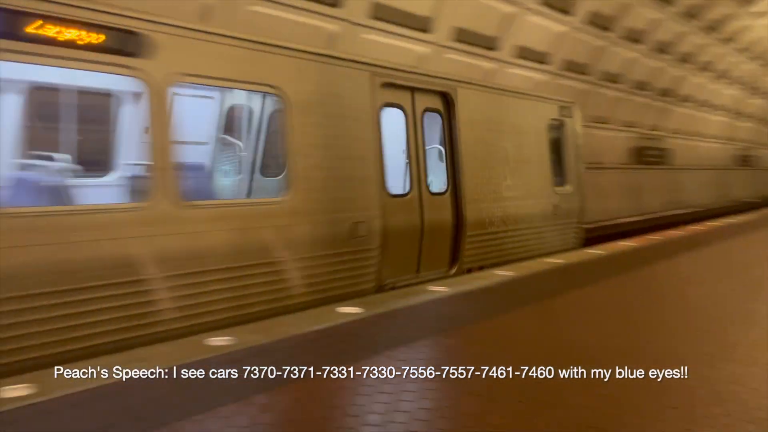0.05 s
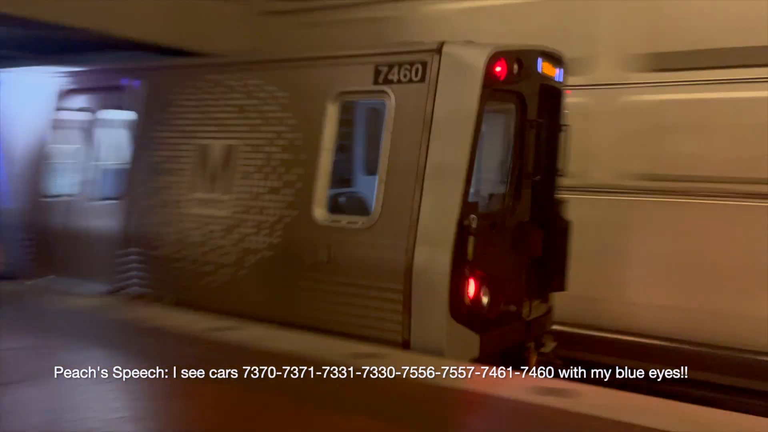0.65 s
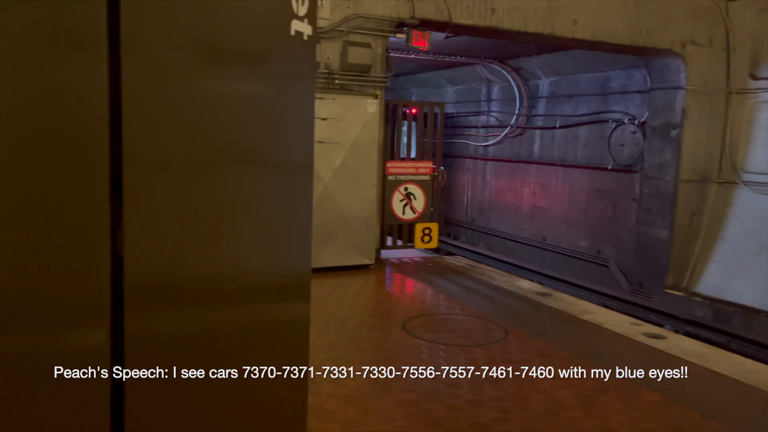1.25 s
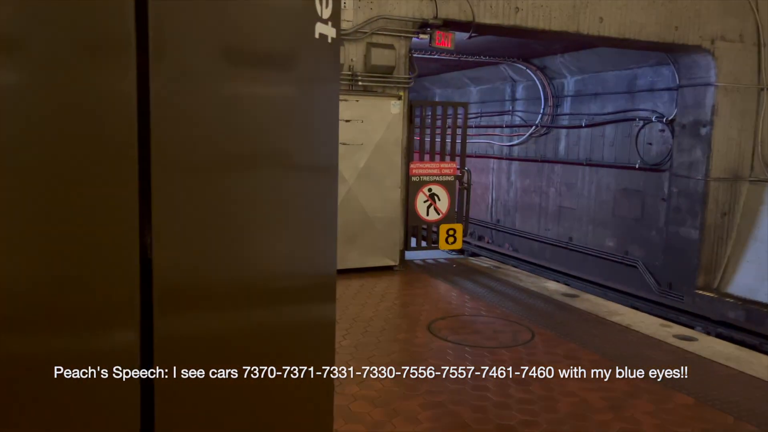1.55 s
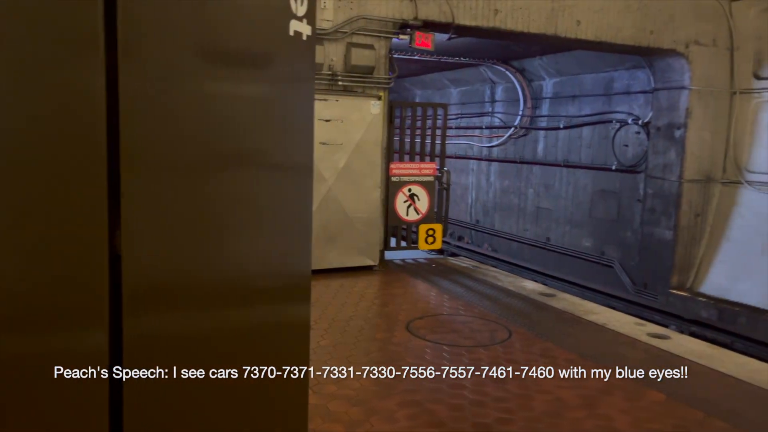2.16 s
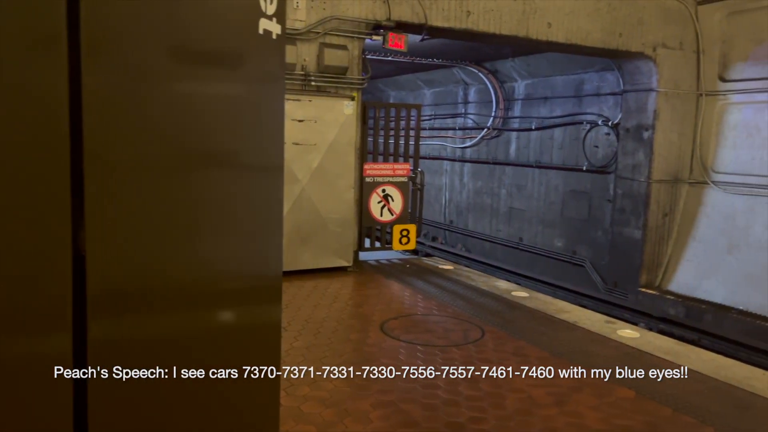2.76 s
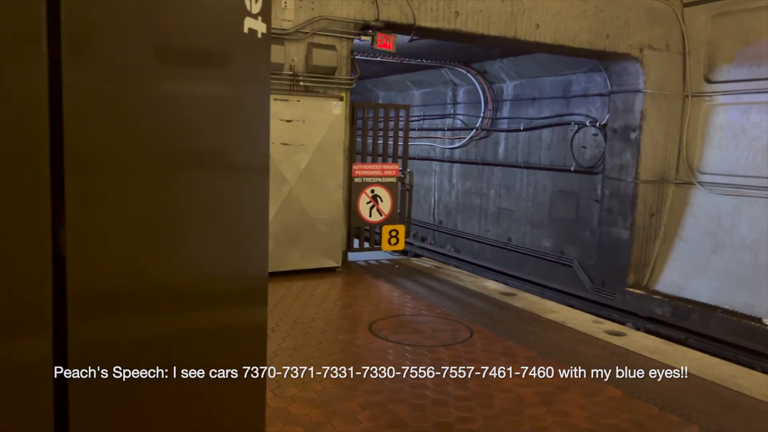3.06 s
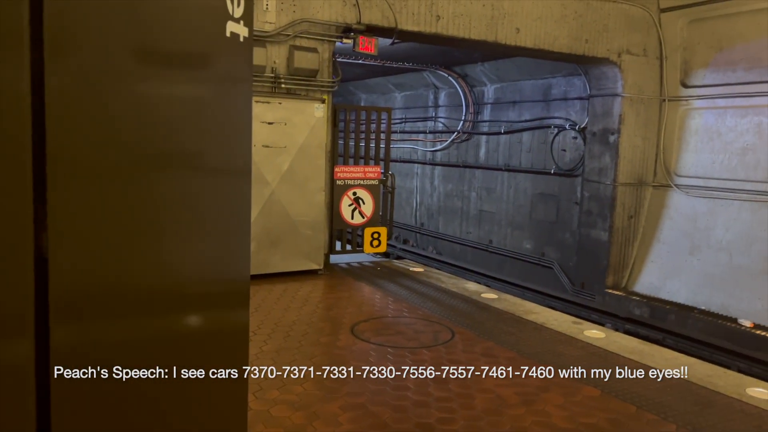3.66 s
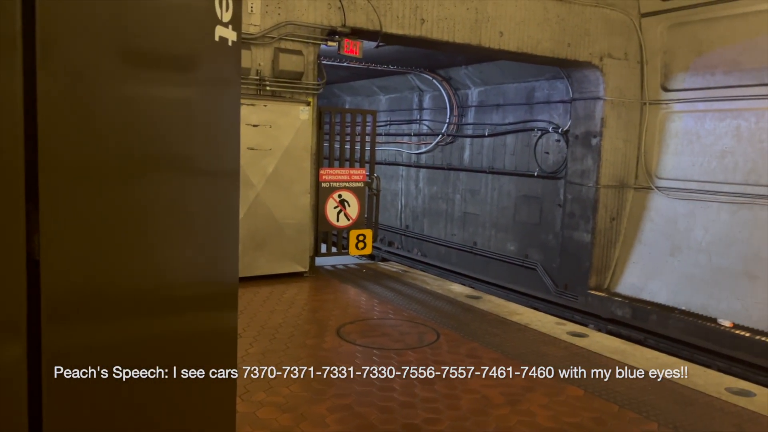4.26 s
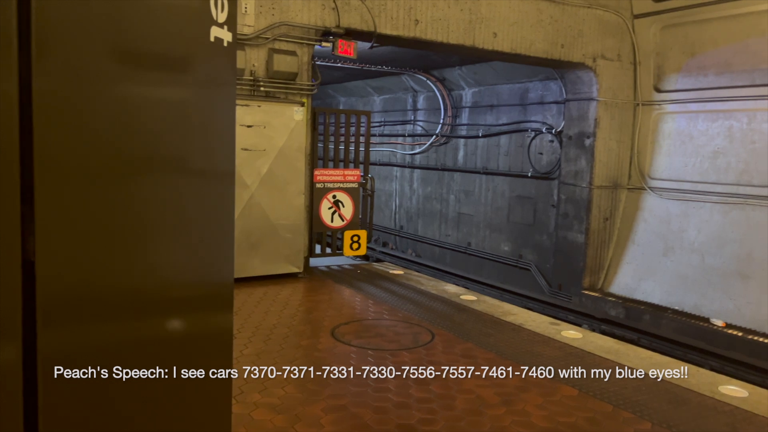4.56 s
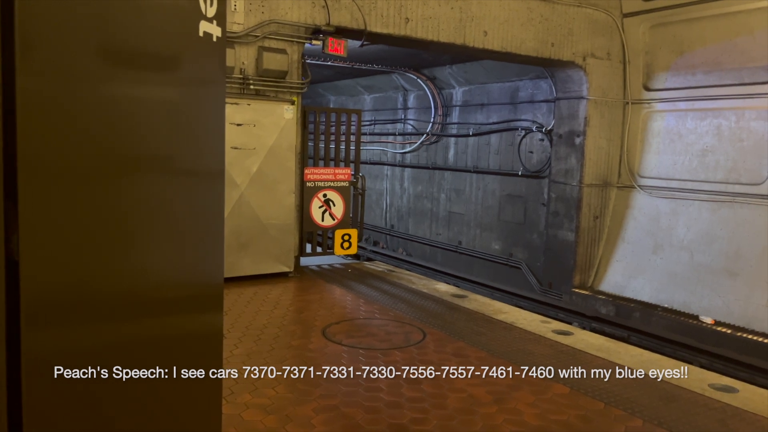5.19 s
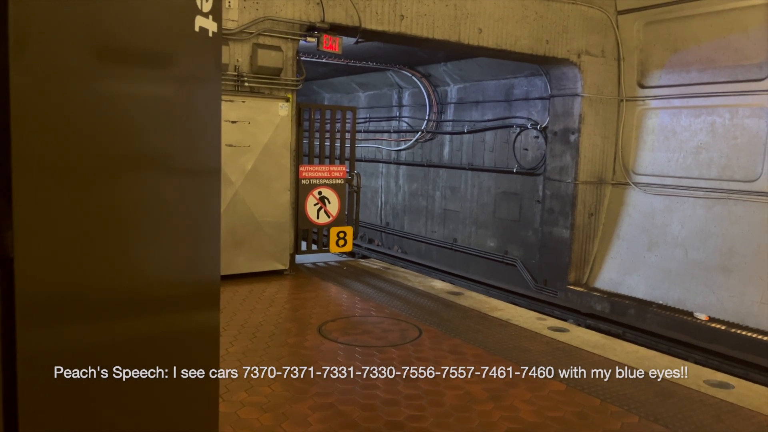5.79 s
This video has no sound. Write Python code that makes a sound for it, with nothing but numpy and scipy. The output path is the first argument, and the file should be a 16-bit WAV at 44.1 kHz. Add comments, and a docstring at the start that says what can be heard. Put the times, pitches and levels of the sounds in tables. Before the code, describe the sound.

Loud low booming and rolling roar of a departing subway train echo through an underground station, with hissing, grinding wheels and a few clashes.

```python
"""A low boom and a hollow roar fill a vaulted station as a subway train's last car runs into the tunnel.
Rough wheels excite the tunnel's air modes, the car panels and the track bed; the last ones clash as they
jolt over the rails. Grinding comes in bouts that swell and die in the echo, raising roar, rail hiss and
flange sizzle together. The higher a sound, the more distance takes from it."""
import sys
import numpy as np
from scipy import signal
from scipy.fft import rfft, irfft
from scipy.io import wavfile
from scipy.ndimage import uniform_filter1d, map_coordinates

SR = 44100
rng = np.random.default_rng(int(sys.argv[2]) if len(sys.argv) > 2 else 0)


def materialize(psi):
    """Save the field psi as 16-bit PCM at rate SR to the path in sys.argv[1].

    A 1-D psi becomes a single channel; in a 2-D psi each row is a channel.
    """
    bounded = np.clip(np.atleast_2d(psi).T, -1, 1)
    quanta = np.round(bounded * 32767).astype(np.int16)
    wavfile.write(sys.argv[1], SR, quanta)


N = 257094
TIME = np.arange(N) / SR
FREQ = np.maximum(np.arange(N // 2 + 1) * SR / N, 1)


def from_db(db):
    """Amplitude ratio: tenfold for every 20 dB."""
    return 10 ** (np.asarray(db) / 20)


def in_time(curve):
    """Linear interpolation of a curve at every sample."""
    return np.interp(TIME, *np.transpose(curve))


def in_frequency(curve):
    """Interpolation of a curve on a log-frequency axis."""
    hz, value = np.transpose(curve)
    return np.interp(np.log(FREQ), np.log(hz), value)


def colour(spectrum):
    """Spectral envelope: a gain that falls 24 dB per octave beyond the table's ends."""
    outside = np.minimum(FREQ / spectrum[0][0], 1) * np.minimum(spectrum[-1][0] / FREQ, 1)
    return from_db(in_frequency(spectrum)) * outside ** 4


def resonance(hz, width_hz):
    """Resonance curve with steep skirts and unit peak gain."""
    return 1 / (1 + ((FREQ ** 2 - hz ** 2) / (FREQ * width_hz * np.sqrt(2))) ** 2)


def modes(table):
    """Incoherent sum: independently driven modes add in power."""
    return np.sqrt(sum((from_db(db) * resonance(hz, width)) ** 2 for hz, width, db in table))


def steady(x, span_s):
    """Normalisation by the running rms: slow drift goes, flutter faster than span_s stays."""
    size = max(int(span_s * SR), 2)
    power = uniform_filter1d(uniform_filter1d(x.mean(0) ** 2, size), size)
    return x / np.sqrt(np.maximum(power, 1e-20))


def tilted(x, db_per_octave, pivot_hz):
    """Time-varying spectral tilt over two octaves either side of a pivot."""
    hz, s, frames = signal.stft(x, SR, nperseg=1024)
    octaves = np.clip(np.log2(np.maximum(hz, 1) / pivot_hz), -2, 2)
    gain = from_db(octaves[:, None] * np.interp(s, TIME, db_per_octave))
    return signal.istft(frames * gain, SR)[1][:, :N]


def shimmer(x, depth_db, spacing_hz, hold_s):
    """Random spectral modulation: weak resonances of steel and vault come and go as the wheels roll."""
    hz, s, frames = signal.stft(x, SR, nperseg=2048)
    knots = rng.standard_normal((1200, 200))
    places = np.meshgrid(hz / spacing_hz, s / hold_s, indexing="ij")
    gain = from_db(depth_db * map_coordinates(knots, places, order=1, mode="mirror"))
    return signal.istft(frames * gain, SR)[1][:, :N]


def swells_db(rows, width_s):
    """Reverberant smoothing: brief rises of level take a Gaussian shape."""
    return sum(db * np.exp(-((TIME - s) / width_s) ** 2) for s, db in rows)


# power arriving straight from the tunnel: f/Hz, fraction
DIRECT_SHARE = [(60, 0.022), (400, 0.35), (1100, 0.26), (1900, 0.11), (3000, 0.19), (5000, 0.17),
                (7300, 0.22), (8600, .04), (15000, .04)]
# likeness of the echo at the two microphones: f/Hz, correlation (limited to -1..1 below)
ECHO_CORRELATION = [(50, 0.99), (120, 0.95), (300, 0.78), (600, 0.5), (900, 0.76), (1400, 0.34),
                    (2000, 0.44), (2700, 0.23), (3600, 0.0039), (5000, 0.33), (6700, -0.48), (8400, 0.96),
                    (10200, 0.86), (11700, -1.17), (13500, -1), (15300, .5)]
# microphone response, left minus right: f/Hz, level/dB
BALANCE = [(50, -0.5), (150, -1.5), (260, -1), (500, 1), (1200, 1.8), (1800, 0.5), (2060, 3), (2750, -1.7),
           (3900, 4.5), (5300, 4), (7300, -2.5), (9000, 0)]

def station_noise(gain, lag_ms=0.38):
    """Direct plus diffuse field: noise from the tunnel reaches the left first, amid the vault's echo."""
    wave, mid, side = rfft(rng.standard_normal((3, N)))
    ears = np.array([[1], [-1]])
    direct = wave * np.exp(1j * np.pi * FREQ * lag_ms / 1000 * ears)
    share = np.clip(in_frequency(DIRECT_SHARE), 0, 1)
    alike = np.clip(in_frequency(ECHO_CORRELATION), -1, 1)
    echo = np.sqrt((1 + alike) / 2) * mid + np.sqrt((1 - alike) / 2) * side * ears
    field = np.sqrt(share) * direct + np.sqrt(1 - share) * echo
    return irfft(field * gain * from_db(in_frequency(BALANCE) * ears / 2), N)


# air modes of the tunnel mouth: f/Hz, bandwidth/Hz, level/dB
TUNNEL_MODES = [(55.3, 16, -2), (63.5, 20, -2), (81, 23, -16.5)]
# throb of the boom: t/s, level/dB
BOOM_LEVEL = [(0, -24), (.15, -27), (.3, -24), (.48, -28.5), (.6, -25.5), (.82, -23), (.93, -21.5),
              (1.08, -21), (1.25, -23), (1.5, -22), (1.88, -24), (1.98, -23.5), (2.08, -23.5), (2.55, -23),
              (2.93, -21), (3.03, -28), (3.13, -22), (3.35, -20.5), (3.6, -31.5), (3.98, -24.5),
              (4.08, -28), (4.16, -22), (4.4, -23), (4.62, -25), (4.72, -30), (4.8, -22.5), (4.98, -21.5),
              (5.09, -27), (5.17, -20), (5.32, -26), (5.44, -22), (5.52, -26), (5.61, -21.5), (5.8, -18.5)]
# heavy thuds: t/s, level/dB above the boom
THUDS = [(.57, 6), (.72, 5.5), (.94, 3.5), (1.81, 6.5), (2.18, 6), (2.89, 2.5), (3.19, 6), (3.77, 11.5),
         (3.88, 2), (4.22, 4), (4.47, 4), (4.81, 3), (4.92, 1.5)]

def tunnel_boom():
    """Air-column resonance: the train pumps the tunnel's lowest modes."""
    level_db = in_time(BOOM_LEVEL) + swells_db(THUDS, width_s=0.04)
    return from_db(level_db) * steady(station_noise(modes(TUNNEL_MODES)), span_s=0.078)


# modes of the car panels: f/Hz, bandwidth/Hz, level/dB
PANEL_MODES = [(96, 19.4, -6.5), (118.9, 32, -2.5), (165.8, 24.6, -4)]
# course of the drone: t/s, level/dB
DRONE_LEVEL = [(0, -23), (.24, -26), (.35, -23), (.57, -27), (.9, -22), (1.3, -27.5), (1.6, -24.5),
               (2.0, -25), (2.3, -22), (2.65, -21.5), (2.8, -26.5), (3.2, -24.5), (3.68, -20.5),
               (3.85, -21.5), (4.28, -23.5), (5.08, -22.5), (5.42, -26.5), (5.55, -21), (5.83, -24.5)]

def car_drone():
    """Forced vibration: rough wheels shake the car panels, which radiate at their modes."""
    return from_db(in_time(DRONE_LEVEL)) * steady(station_noise(modes(PANEL_MODES)), span_s=0.09)


# spectrum of the track bed: f/Hz, level/dB
RUMBLE_SPECTRUM = [(130, -22), (190, -2.5), (215, -0.5), (255, 1), (325, -0.5), (385, .5), (430, -8),
                   (560, -36)]
# course of the rumble: t/s, level/dB
RUMBLE_LEVEL = [(0, -25), (1.4, -24), (2.5, -23.5), (2.85, -25.5), (3.25, -22.5), (4.0, -26), (4.33, -28.5),
                (4.6, -24), (5.2, -26.5), (5.83, -24)]
# hollow wheel knocks: t/s, level/dB above the rumble
KNOCKS = [(.42, 3.5), (1.01, 3.5), (1.41, 2), (1.71, 1), (2.29, 2), (2.59, 2.5), (3.21, 0), (3.68, 2.5),
          (3.95, 1)]

def track_rumble():
    """Roughness excitation: the wheels shake the track bed and now and then knock in it."""
    level_db = in_time(RUMBLE_LEVEL) + swells_db(KNOCKS, width_s=0.034)
    return from_db(level_db) * steady(station_noise(colour(RUMBLE_SPECTRUM)), span_s=0.075)


# bouts of grinding: onset t/s, rise time/s, duration/s, limiting level/dB relative to plain rolling
GRINDS = [(-.38, 0.17, .97, 0), (0.742, 0.32, 0.13, 4), (1.022, 0.81, 0.27, 6), (1.592, 0.21, 0.31, 4.5),
          (1.972, 0.62, 0.59, 7), (2.86, 0.6, .15, 8), (2.998, 0.6, 0.25, 13.5), (3.377, 0.46, 0.36, 9.5),
          (4.23, 0.34, 0.7, 9.5), (5.394, 0.54, 0.31, 15)]

def grinding_db(vault_t60_s=2.7):
    """Build-up and reverberant decay: each bout adds its power to that of plain rolling."""
    power = 1
    for start, rise_s, length, db in GRINDS:
        rise = 1 - np.exp(-np.maximum(TIME - start, 0) / rise_s)
        echo_db = -60 * np.maximum(TIME - start - length, 0) / vault_t60_s
        power = power + rise * from_db(db + echo_db) ** 2
    return 10 * np.log10(power)


def doublings(entry_s=1.71, first_doubling_s=0.26):
    """Uniform recession: doublings of the train's distance since it entered the tunnel."""
    return np.log2(1 + np.maximum(TIME - entry_s, 0) / first_doubling_s)


def wheel_level(rolling_db, db_per_grind_db, loss_db):
    """Source level less transmission loss: up with grinding, down loss_db per doubling of distance."""
    return rolling_db + db_per_grind_db * grinding_db() - loss_db * doublings()


# spectrum of the roar from the tunnel: f/Hz, level/dB
ROAR_SPECTRUM = [(330, -9), (425, -0.5), (510, 0), (620, -2.5), (730, -5), (870, -8), (1000, -7.5),
                 (1100, -10.5), (1300, -13.5), (1670, -16), (1800, -27), (2300, -58)]
# modes of the bogie frame and wheels: f/Hz, bandwidth/Hz, level/dB
BOGIE_MODES = [(438, 54, -5), (592, 21, -2.5), (663, 41, -7.5), (763, 59, -7), (852, 110, -6),
               (955, 78, -17.5)]

def rolling_roar(dulling=0.11, bogie_db=8, bogie_fade_db_per_s=5.5):
    """Rolling noise: the last bogie's hollow modes give way to a roar that dulls as it weakens."""
    roar_db = wheel_level(rolling_db=-23.5, db_per_grind_db=0.5, loss_db=2.73)
    far = tilted(station_noise(colour(ROAR_SPECTRUM)), dulling * (roar_db - roar_db.mean()), pivot_hz=700)
    near = from_db(bogie_db - bogie_fade_db_per_s * TIME) * station_noise(modes(BOGIE_MODES))
    roar = shimmer(far + near, depth_db=1.1, spacing_hz=44.5, hold_s=0.2187)
    return from_db(roar_db) * steady(roar, span_s=0.25)


# spectrum of steel grinding on steel: f/Hz, level/dB
HISS_SPECTRUM = [(1300, -33), (1800, 0), (2350, 0.5), (2900, -1), (3450, -2.5), (4200, -6), (4550, -9.5),
                 (4950, -11), (5500, -16.5), (6100, -16), (7000, -23.5), (9000, -31), (16000, -56)]
# bending modes of the rails: f/Hz, bandwidth/Hz, level/dB
RAIL_MODES = [(2340, 280, -5), (2630, 170, -8.5), (3130, 150, -9.5), (3390, 120, -8), (3780, 140, -13),
              (4550, 160, -5), (5260, 260, -8.5), (5610, 180, -9), (6420, 80, -17), (7400, 80, -19.5)]

def rail_hiss(brightening=0.7, singing=0.5, carry_db=1.4, bite=0.63, dulling_db=1.6):
    """Friction noise: harder, nearer contact is brighter; the rails' singing modes carry farthest."""
    distance = doublings()
    contact_db = bite * grinding_db() - dulling_db * distance
    contact_db -= contact_db.mean()
    hiss = station_noise(colour(HISS_SPECTRUM))
    song_db = singing * contact_db + carry_db * (distance - distance[-1])
    song = from_db(song_db) * station_noise(modes(RAIL_MODES))
    steel = shimmer(hiss + song, depth_db=2.9, spacing_hz=40.1, hold_s=0.11)
    steel = tilted(steel, brightening * contact_db, pivot_hz=2800)
    hiss_db = wheel_level(rolling_db=-40, db_per_grind_db=0.91, loss_db=3.11)
    return from_db(hiss_db) * steady(steel, span_s=0.49)


# lowest ringing modes of the rails: f/Hz, bandwidth/Hz, level/dB
LOW_RAIL_MODES = [(1537, 280, 1.5), (1686, 100, 0.5)]

def rail_ring():
    """Sustained resonance: wheel contact keeps the rails ringing."""
    ring_db = wheel_level(rolling_db=-41.5, db_per_grind_db=0.61, loss_db=2.7)
    return from_db(ring_db) * steady(station_noise(modes(LOW_RAIL_MODES)), span_s=0.16)


# spectrum of the rubbing flanges: f/Hz, level/dB
SIZZLE_SPECTRUM = [(4000, -26.5), (6200, 10.5), (7350, 2), (8400, -4.5), (9200, -3), (10200, 1),
                   (10700, -1.5), (11200, -12.5), (13000, -24), (14400, -17.5), (15300, -21),
                   (16000, -23.5)]

def flange_sizzle(dulling=0.53):
    """High-frequency attenuation: the flanges' friction noise fades fastest and dulls with distance."""
    sizzle_db = wheel_level(rolling_db=-54, db_per_grind_db=0.71, loss_db=6.8)
    sizzle = shimmer(station_noise(colour(SIZZLE_SPECTRUM)), depth_db=3.5, spacing_hz=55, hold_s=0.1)
    sizzle = tilted(sizzle, dulling * (sizzle_db - sizzle_db.mean()), pivot_hz=8000)
    return from_db(sizzle_db) * steady(sizzle, span_s=0.15)


# scrapes and thin rings of wheels and bogies: peak t/s, swell and tail time/s, f/Hz, bandwidth/Hz, level/dB
RIM_RINGS = [(.1, 0.12, 587, 70, -29), (.24, 0.075, 10100, 200, -52), (.25, 0.067, 825, 150, -27.5),
             (.45, 0.16, 5170, 400, -50), (.08, .1, 1680, 50, -41), (.5, 0.049, 1690, 35, -39),
             (.52, 0.046, 2950, 180, -42), (.58, 0.073, 3320, 250, -43), (.95, .045, 1665, 30.2, -37),
             (1.18, 0.037, 1644, 35, -34), (1.21, 0.055, 7900, 400, -53), (1.41, 0.044, 890, 60, -24),
             (1.44, 0.048, 2650, 200, -42), (1.51, 0.046, 2330, 130, -40.5), (1.5, .04, 840, 50, -31),
             (1.73, 0.12, 10250, 450, -51.5), (1.73, 0.075, 7280, 220, -54),
             (1.76, 0.075, 15400, 400, -58.5), (1.79, .08, 6400, 120, -59), (1.8, 0.11, 1710, 160, -44),
             (1.66, 0.043, 920, 110, -32), (1.82, 0.068, 890, 170, -28.5), (2.07, 0.086, 7830, 250, -59),
             (2.45, 0.19, 3400, 600, -51), (3.07, 0.093, 2400, 402, -42.5), (3.17, 0.23, 8700, 1110, -63.5),
             (3.17, 0.079, 1580, 200, -41), (3.25, 0.11, 950, 200, -36), (3.4, 0.14, 650, 160, -32.5),
             (4.29, .06, 4560, 128, -55.5), (4.58, 0.16, 4560, 110, -56), (4.3, 0.066, 5460, 800, -58.5),
             (4.78, 0.15, 5530, 400, -57), (4.9, .08, 7420, 80, -71), (4.9, 0.044, 2420, 500, -48),
             (5.58, .07, 5540, 350, -56), (5.62, 0.054, 2470, 170, -49), (5.72, 0.045, 3430, 200, -54),
             (5.72, 0.04, 620, 90, -30)]
# one-note hums of a car panel or the tunnel bore, and the ring of hollow wheel knocks near 390 Hz: columns as
# above
HUMS = [(.1, .05, 173, 20, -22.5), (.38, 0.081, 407, 59, -24.5), (1.01, 0.03, 167, 20, -23),
        (1.13, 0.072, 119, 8.7, -19.5), (1.37, 0.15, 112.6, 21, -19), (1.36, 0.096, 325, 18, -30.5),
        (1.72, 0.054, 280, 47, -24), (1.85, 0.058, 377, 33, -27), (2.17, 0.035, 167, 15, -24),
        (2.28, 0.023, 347, 54, -29), (2.42, 0.028, 315, 20, -21), (2.57, .04, 176, 22, -23.5),
        (2.58, 0.055, 257, 36, -30), (2.62, 0.061, 120, 16, -25), (3.16, 0.026, 168.4, 11, -21.5),
        (3.27, 0.046, 390, 16, -26.5), (3.66, .06, 494, 51, -28.5), (3.72, .04, 386, 35, -24.5),
        (3.95, 0.063, 387, 15, -27), (4.53, 0.095, 119.4, 14, -21.5), (4.6, 0.098, 390, 38, -34.5),
        (4.83, 0.2, 104.4, 15, -22), (4.94, 0.043, 170, 22, -24), (5.2, 0.11, 389, 19, -33),
        (5.56, 0.033, 116, 13, -21), (5.6, .09, 91, 16, -22), (5.81, 0.033, 386, 30, -22.5)]

def brief_resonances(table, span_s):
    """Transient resonance: friction drives one mode for a moment; it swells, then dies in the echo."""
    friction, out = station_noise(1), np.zeros((2, N))
    for s, length, hz, width_hz, db in table:
        span = slice(*np.searchsorted(TIME, [s - 3 * length, s + 7 * length]))
        b, a = signal.iirpeak(hz, hz / (width_hz * np.sqrt(2)), fs=SR)
        ring = signal.lfilter(b, a, signal.lfilter(b, a, friction[:, span]))
        age = (TIME[span] - s) / length
        swell_and_tail = np.exp(-np.where(age < 0, age ** 2, age))
        out[:, span] += from_db(db) * swell_and_tail * steady(ring, span_s)
    return out


# jolts of the last wheels: t/s, level/dB, rise time/s, decay time/s, added tilt/(dB per octave)
CLASHES = [(1.046, -30, 0.011, 0.091, -6.5), (1.158, -27.5, 0.032, .1, -4), (1.262, -36, .015, .05, -8),
           (1.408, -32, .005, 0.046, -7), (1.725, -34, .02, .08, -3), (1.985, -37, .005, 0.027, -6)]
# spectrum of struck steel: f/Hz, level/dB
CLASH_SPECTRUM = [(1500, 1), (2500, 1.5), (5500, -1), (8500, -6.5), (10700, -6)]

def wheel_clashes(pivot_hz=4000):
    """Impact excitation: each jolt sets the steel crashing; the vault rounds the onset and adds a tail."""
    out = np.zeros((2, N))
    for s, db, rise_s, decay_s, slope_db in CLASHES:
        crash = station_noise(colour(CLASH_SPECTRUM) * from_db(slope_db * np.log2(FREQ / pivot_hz)))
        age = np.maximum(TIME - s, 0)
        envelope = (1 - np.exp(-age / rise_s)) * np.exp(-age / decay_s)
        out += from_db(db) * envelope * crash / crash.std()
    return out


def scene():
    """Superposition: the pressures of all the departing train's sources add."""
    lows = tunnel_boom() + car_drone() + track_rumble()
    wheels = rolling_roar() + rail_hiss() + rail_ring() + flange_sizzle()
    rim_rings = brief_resonances(RIM_RINGS, span_s=0.046)
    hums = brief_resonances(HUMS, span_s=0.065)
    return lows + wheels + rim_rings + hums + wheel_clashes()


def record(dry, low_cut_hz=34, high_cut_hz=15750):
    """Band limiting: the microphones shed the deepest bass, and the top is cut steeply."""
    thinned = signal.sosfilt(signal.butter(4, low_cut_hz, "high", fs=SR, output="sos"), dry)
    return signal.sosfilt(signal.ellip(10, 0.1, 80, high_cut_hz, fs=SR, output="sos"), thinned)


dry = scene()
out = record(dry)
materialize(out)
```